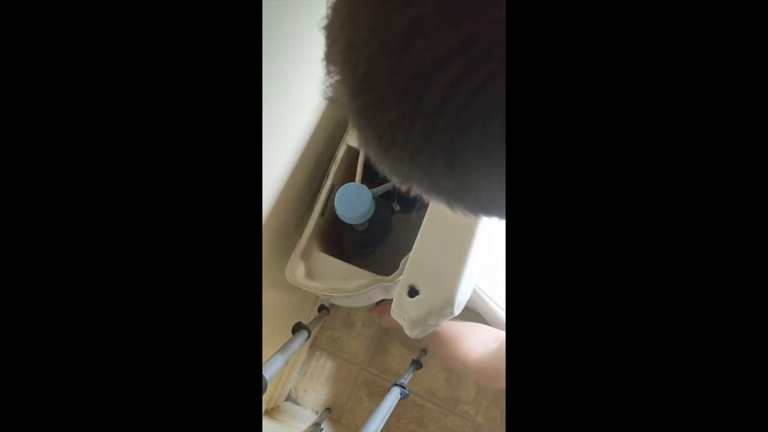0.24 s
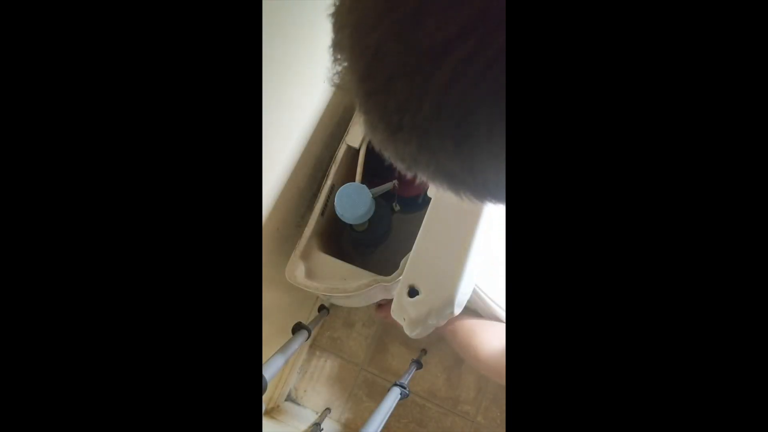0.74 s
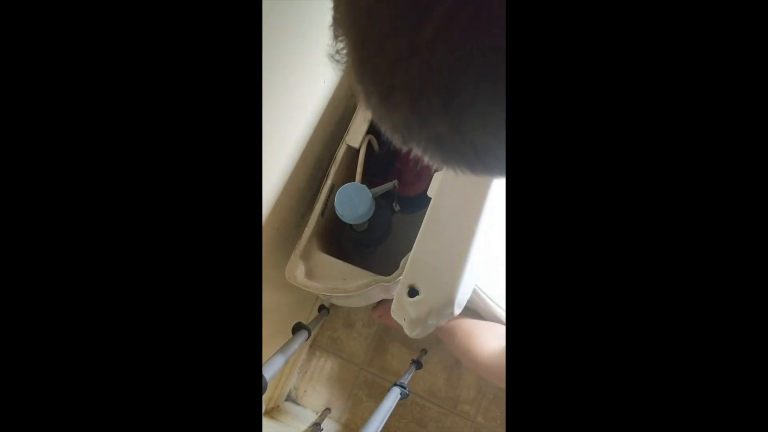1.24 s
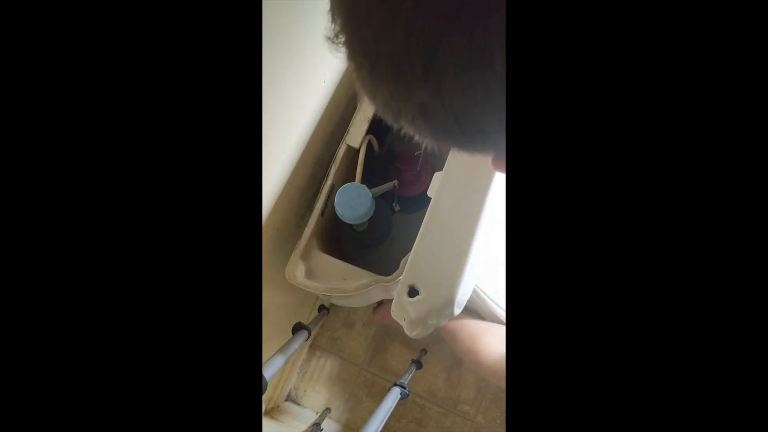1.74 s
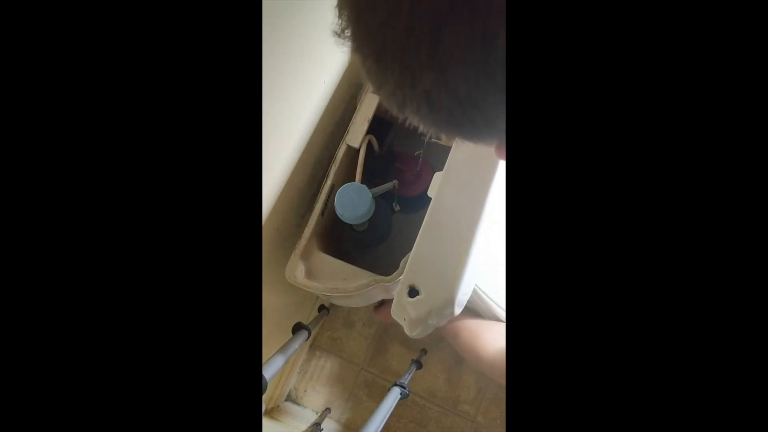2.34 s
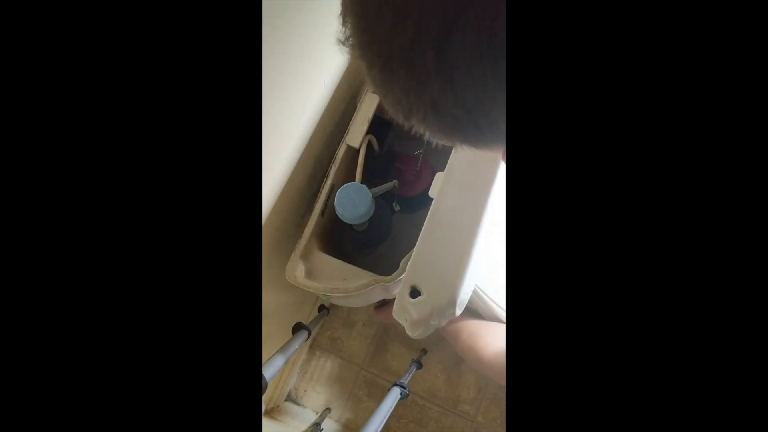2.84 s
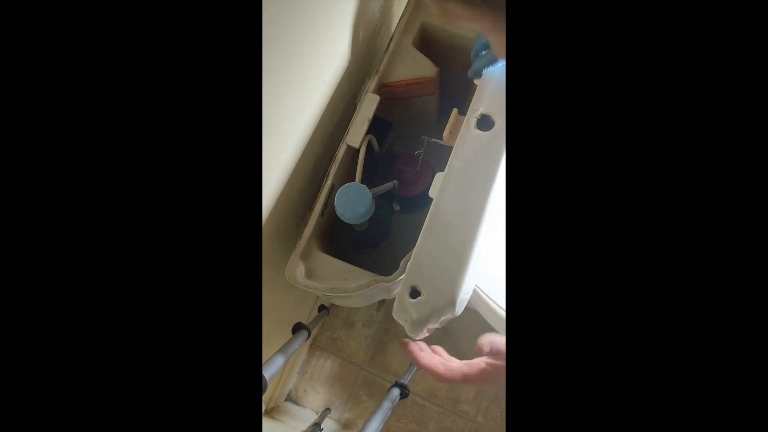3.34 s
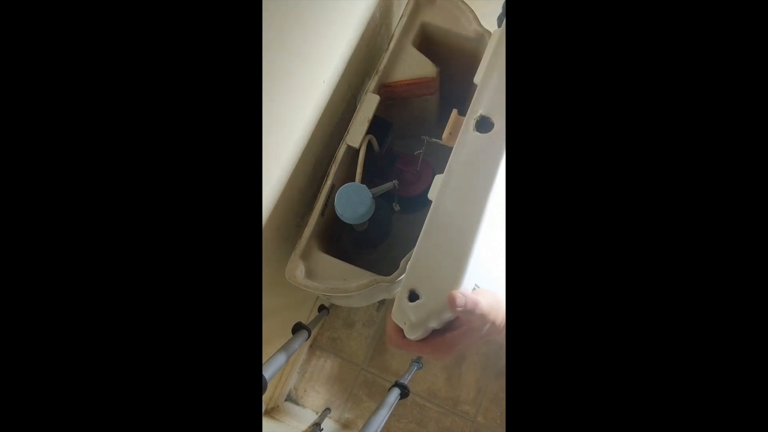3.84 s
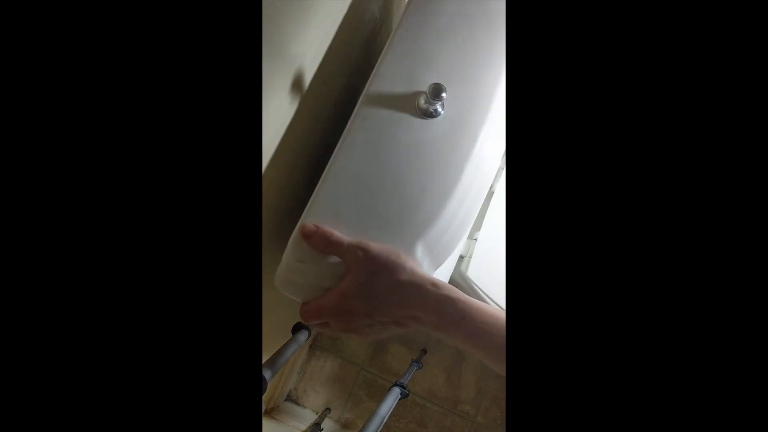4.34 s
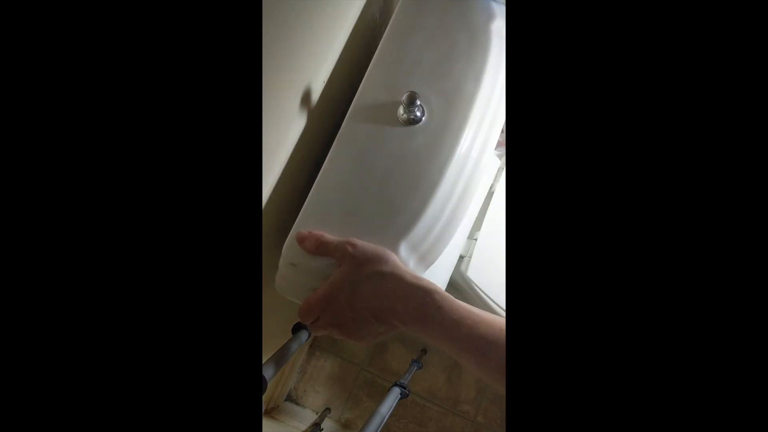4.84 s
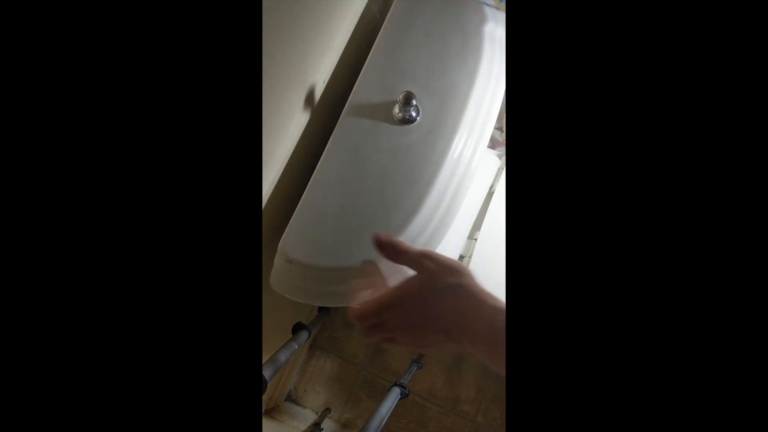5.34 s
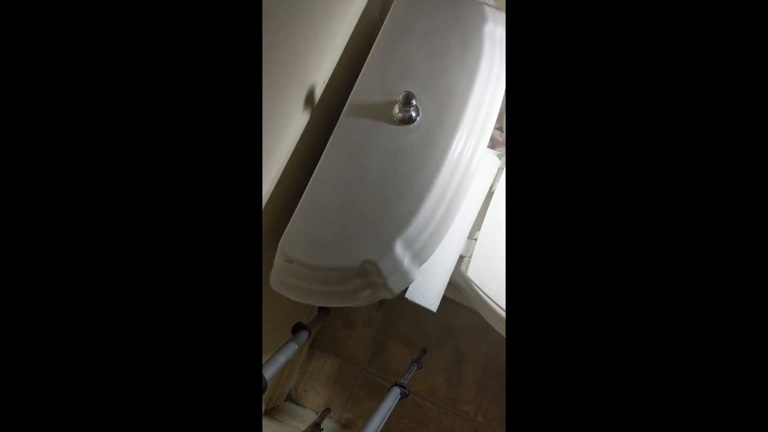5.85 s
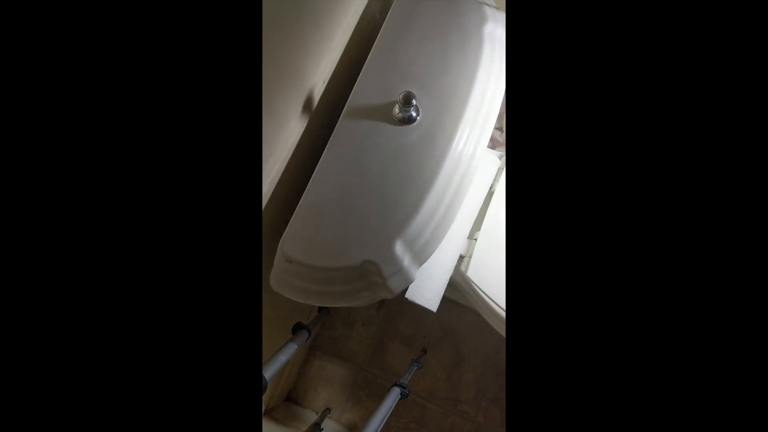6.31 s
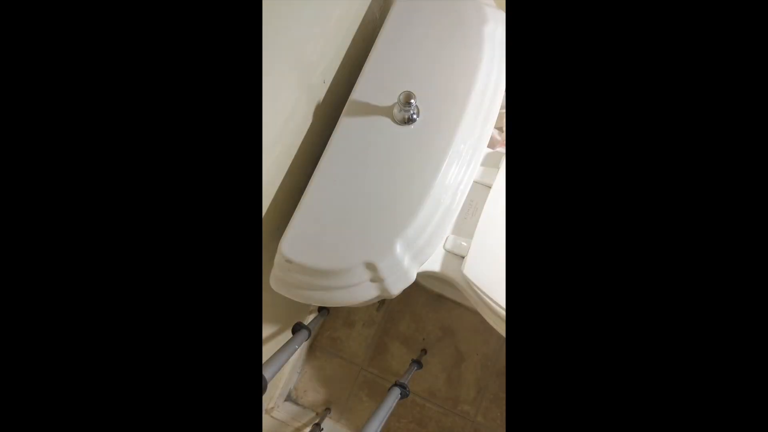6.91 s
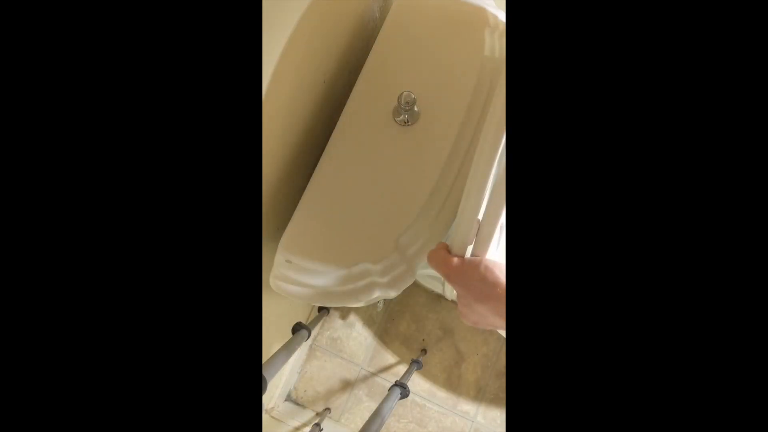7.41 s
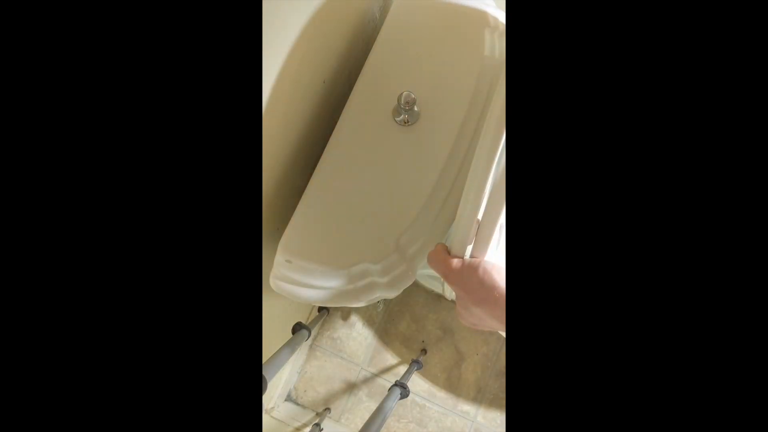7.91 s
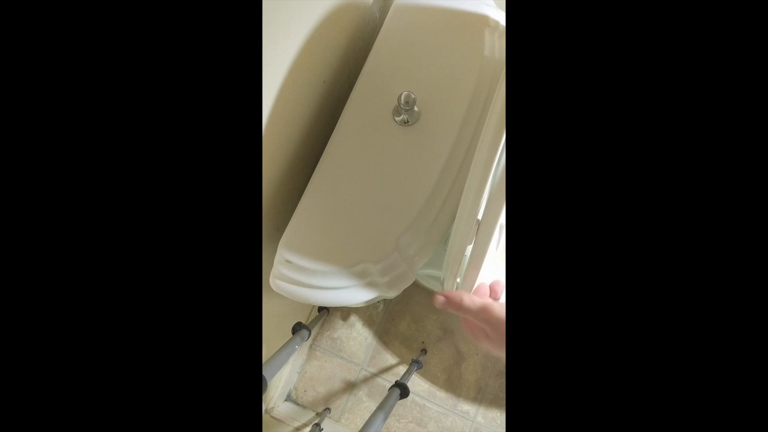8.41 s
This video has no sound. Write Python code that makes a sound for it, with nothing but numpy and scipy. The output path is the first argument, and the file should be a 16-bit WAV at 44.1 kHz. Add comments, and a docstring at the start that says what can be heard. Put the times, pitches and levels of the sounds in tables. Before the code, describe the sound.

Close up in a small tiled bathroom, a toilet tank refills with a bright, sputtering hiss, sharp drips and brief valve squeaks. The porcelain lid scrapes, knocks, then lands in four loud, quick clunks around five seconds. The water drops to a faint hollow hiss with soft plinks, while the seat is handled and clacks against the tank near seven seconds.

```python
"""A toilet tank refills in a small tiled bathroom: shaped noise makes the fill valve's hiss, swept tones
its squeaks, and short decaying tones the spray and drips that fall into the water.
The porcelain lid rubs as it is picked up (stick-slip tones), then clunks onto the tank in four main blows
(struck modes over clatter) and muffles the hiss. Drips go on ringing in the closed tank's air
while the seat is raised and knocks against it; room rumble and rustling hands are coloured noise."""
import sys
import numpy as np
from scipy import signal
from scipy.fft import rfft, irfft, next_fast_len
from scipy.io import wavfile
from scipy.ndimage import map_coordinates

SR = 44100
rng = np.random.default_rng(int(sys.argv[2]) if len(sys.argv) > 2 else 0)


def put_to_file(sound):
    """Save the sound as 16-bit audio at rate SR, in the file named by the first command-line argument."""
    columns = np.atleast_2d(sound).T  # one column per channel
    safe = np.clip(columns, -1, 1)
    whole_steps = np.round(safe * 32767)
    wavfile.write(sys.argv[1], SR, whole_steps.astype(np.int16))


N = 382347

# decay of the broadband part of knocks: frequency_hz, t60_s
KNOCK_DECAY = [(150, 0.13), (600, 0.082), (2500, 0.086), (8000, 0.087), (15000, 0.128)]
CLOSED_S, CLOSING_S = 5.0, 0.13  # the lid shuts the tank: middle and length of the ramp


def amp(db):
    """Level law: decibels to amplitude gain."""
    return 10 ** (np.asarray(db) / 20)


def unit(x):
    """Power normalisation: scale to rms 1."""
    return x / np.sqrt(np.mean(x ** 2) + 1e-20)


def along(points, hz):
    """Interpolate (frequency_hz, value) points on a logarithmic frequency axis."""
    point_hz, values = np.transpose(points)
    return np.interp(np.log(hz + 1), np.log(point_hz + 1), values)


def wobble(rate_hz, size):
    """Slow random modulation: a smooth curve through rate_hz random knots a second."""
    knots = rng.standard_normal(int(size * rate_hz / SR) + 4)
    return map_coordinates(knots, [np.arange(size) * rate_hz / SR])


def step(at_s, over_s):
    """Linear transition from 0 to 1, centred on a moment."""
    return np.clip((np.arange(N) / SR - at_s) / over_s + .5, 0, 1)


def filtered(x, response):
    """Linear filtering: multiply the spectrum of x by a function of frequency."""
    size = next_fast_len(len(x) + 8192)
    hz = np.fft.rfftfreq(size, 1 / SR)
    return irfft(rfft(x, size) * response(hz), size)[:len(x)]


def noise(spectrum, size):
    """Turbulence and friction as coloured Gaussian noise of rms 1."""
    return unit(filtered(rng.standard_normal(size), lambda hz: amp(along(spectrum, hz))))


def resonate(x, modes):
    """Parallel resonators (centre_hz, width_hz, level_db), squared for steeper, narrower peaks."""
    def response(hz):
        total = 0
        for centre_hz, width_hz, db in modes:
            damping = 1j * hz * width_hz
            total = total + amp(db) * (damping / (centre_hz * centre_hz - hz * hz + damping)) ** 2
        return total

    return filtered(x, response)


def soften(x, corner_hz):
    """Contact stiffness: a softer contact lasts longer and so keeps less treble."""
    return signal.lfilter(*signal.butter(2, min(corner_hz, SR / 2 - 1), fs=SR), x)


def dying(x, decay):
    """Frequency-dependent damping: each band of x dies at its own speed."""
    hz, t, bands = signal.stft(x, SR, nperseg=256)
    damped = bands * amp(-60 * t / along(decay, hz)[:, None])
    return signal.istft(damped, SR, nperseg=256)[1][:len(x)]


def fade(t, t60):
    """Exponential decay by 60 dB in t60 seconds."""
    return np.exp(-np.log(1000) * t / t60)


def ring(t, hz, t60):
    """One struck mode: a damped sinusoid."""
    return np.sin(2 * np.pi * hz * t) * fade(t, t60)


def swell(u, edge):
    """Rounded on-off envelope over u = 0..1; a smaller edge power is squarer."""
    return np.abs(np.sin(np.pi * u)) ** edge


def add(track, s, x):
    """Superposition: mix x into the track at time s."""
    i = max(round(s * SR), 0)
    track[i:i + len(x)] += x[:max(N - i, 0)]


def room(x, wet_db):
    """Reverberation: the tiled walls answer with a short, dense tail, convolved with the source."""
    # decay of the tiled room: frequency_hz, t60_s
    tile_decay = [(150, 0.32), (1000, 0.18), (4000, 0.15), (14000, 0.1)]
    tail = dying(rng.standard_normal(SR // 2), tile_decay)
    tail = np.pad(tail / np.linalg.norm(tail), (SR // 300, 0))  # the first echo comes late
    return x + amp(wet_db) * signal.fftconvolve(x, tail)[:N]


def bubble(hz, cycles, rise):
    """Bubble resonance: a tone decays by 1/e every so many cycles, gliding as it nears the surface."""
    t = np.arange(SR // 20) / SR
    u = t * hz / cycles
    phase = 2 * np.pi * np.cumsum(hz * (1 + rise * u)) / SR
    return np.sin(phase) * np.exp(-u) * (1 - np.exp(-8 * u))


def splat(hz, t60):
    """Drop impact: a brief, decaying patch of resonant noise around one pitch."""
    t = np.arange(SR // 20) / SR
    return unit(resonate(rng.standard_normal(len(t)), [(hz, hz / 4, 0)])) * fade(t, t60)


def plink(hz):
    """Cavity resonance: a drop's pitch starts sharp and settles near a resonance of the enclosed air."""
    t = np.arange(SR // 8) / SR
    pitch_hz = hz * (1 + 0.058 * fade(t, 0.032) + 0.018 * wobble(290, len(t)))
    warble = np.sin(2 * np.pi * np.cumsum(pitch_hz) / SR) * amp(2.0 * wobble(130, len(t)))
    return warble * fade(t, 0.13) * (1 - np.exp(-t / 0.0029))


def spray(count, low_hz, high_hz, cycles, spread_db):
    """Random superposition: droplets tick with random pitch, life and size, rms 1 in all."""
    when, pitch, life, size = rng.random((count, 4)).T[:, :, None]
    i = np.arange(SR // 70)
    turns = i / SR * low_hz * (high_hz / low_hz) ** pitch
    age = turns / (cycles * (.5 + life))
    size_db = spread_db * np.minimum(-np.log(1 - size), 4.2)  # few large drops, many small
    ticks = np.sin(2 * np.pi * turns) * np.exp(-age) * (1 - np.exp(-4 * age)) * amp(size_db)
    places = (when * N).astype(int) + i
    return unit(np.bincount(places.ravel(), ticks.ravel(), N)[:N])


def sputter(count, low_hz, high_hz, spread_db):
    """Random superposition: scattered splats of random pitch and size, rms 1 in all."""
    out = np.zeros(N)
    for when, pitch, size in rng.random((count, 3)):
        hz = low_hz * (high_hz / low_hz) ** pitch
        add(out, when * N / SR, amp(spread_db * size) * splat(hz, t60=0.0633))
    return unit(out)


def room_rumble():
    """Ambient noise: a steady random sound weighted to the low frequencies."""
    # spectrum: frequency_hz, density_db (relative, per Hz)
    rumble_spectrum = [(25, -2), (40, 0.5), (58, -9.5), (75, -22), (95, -4), (120, 1), (160, 0.5),
                       (200, -7.5), (250, -5), (350, -12.5), (460, -8.5), (570, -17), (660, -11.5),
                       (860, -25), (1300, -29)]
    return amp(-65.0) * noise(rumble_spectrum, N)


def rustles():
    """Sliding friction: skin moves over glaze and plastic in a quick string of small slips."""
    # hands slide over lid and seat: start_s, length_s, level_db
    slides = [(3.802, 0.13, -61), (3.937, 0.03, -53), (4.11, 0.031, -50.5), (4.677, 0.14, -60),
              (6.122, 0.25, -69.5), (6.453, 0.1, -63), (6.882, 0.13, -69)]
    # spectrum of the rub: frequency_hz, density_db (relative, per Hz)
    skin_spectrum = [(500, -9), (1500, -4), (3000, 2.5), (5000, -6.5), (7800, 3.5), (10000, -7.5),
                     (15500, -7)]
    out = np.zeros(N)
    for s, length_s, db in slides:
        slips = noise(skin_spectrum, SR // 2) * amp(5.1 * wobble(242, SR // 2))
        rub = unit(slips[:int(length_s * SR)])
        add(out, s, amp(db) * rub * swell(np.linspace(0, 1, len(rub)) ** .5, edge=.5))
    return out


def groans():
    """Stick-slip friction of lid and seat: a tone breaks into a scrape when the slips are uneven."""
    # rubs on the rests: start_s, length_s, pitch_hz, level_db, roughness (limited to 0-1)
    rubs = [(0.043, 0.15, 1573, -58, 0.37), (0.058, 0.094, 502, -59, .83), (3.522, 0.059, 142, -51.5, 0.07),
            (3.516, 0.053, 600, -54.5, 1.16), (3.572, 0.059, 452.6, -45, .03),
            (3.64, 0.13, 459.5, -61, 0.26), (6.16, 0.064, 292, -59, 0.6), (6.242, 0.082, 407, -57.5, 0.17)]
    out, t = np.zeros(N), np.arange(SR // 4) / SR
    for s, length_s, hz, db, rough in rubs:
        slips = rng.standard_normal(len(t)) * amp(5.1 * wobble(152, len(t)))
        scrape = unit(resonate(slips, [(hz, hz / 2.26, 0)]))
        share = np.clip(rough, 0, 1)  # the scrape's share of the power
        rub = np.sqrt(1 - share) * np.sin(2 * np.pi * hz * t) + np.sqrt(share) * scrape
        rub = rub[:int(length_s * SR)]
        add(out, s, amp(db) * unit(rub * swell(np.linspace(0, 1, len(rub)) ** 0.28, edge=0.28)))
    return out


def thud(t):
    """Low modes of tank and bowl, excited by any blow, build up and boom."""
    boom = ring(t, 142.6, 0.17) - 0.36 * ring(t, 111, .18) - .5 * ring(t, 185, 0.12)
    return boom * (1 - np.exp(-t / 0.0064))


def seat():
    """Impact of seat and hinges: a damped noise clack, one mode set by the struck spot, and a thud."""
    # knocks: start_s, level_db, spot_hz (mode of the struck spot), ring_db, brightness_hz
    knocks = [(4.369, -47, 200, -2, 500), (4.412, -56, 1320, -18, 12060), (4.7, -54, 458, 3, 2940),
              (4.754, -52, 1310, -9.5, 5840), (6.164, -62, 243, 17, 504), (6.251, -53.5, 251, 9, 1400),
              (6.478, -52.5, 256, 14.5, 1100), (6.765, -37.5, 157, 9, 411), (6.787, -33, 935, 10.5, 1720),
              (6.79, -31.5, 1028, 9, 3200), (6.905, -57, 257, 10, 3050), (6.94, -52.5, 149, 11, 1508),
              (6.982, -42, 1087, 13.5, 1720), (7.04, -52, 1064, 3.5, 1190), (7.331, -37.5, 500, 5, 6900),
              (7.361, -49, 610, 14, 800)]
    # spectrum of the clack: frequency_hz, density_db (relative, per Hz)
    body_spectrum = [(40, -37.5), (100, -41), (220, -3), (450, -6), (620, -6.5), (800, -4), (1400, -1),
                     (1750, -7.5), (2150, -1), (3000, -14), (5000, -13.5), (9000, -10.5), (15500, -7.5)]
    thud_db, thud_grows = -28.5, 0.39  # boom at a 0 dB knock; slow growth with force (dB per dB)
    rattle_db = 3  # unsteadiness of the ring
    out, t = np.zeros(N), np.arange(SR // 2) / SR
    for s, db, spot_hz, ring_db, bright_hz in knocks:
        clack = dying(noise(body_spectrum, len(t)), KNOCK_DECAY) * (1.75 + fade(t, 0.023))
        contact = 1 - np.exp(-t * bright_hz / 4)  # soft contacts build up more slowly
        spot = amp(ring_db + rattle_db * wobble(216, len(t))) * ring(t, spot_hz, 0.058)
        knock = amp(db) * contact * (soften(clack, bright_hz) + spot)
        add(out, s, knock + amp(thud_db + thud_grows * db) * thud(t))
    return out


def lid():
    """Modal impact: each contact rings the porcelain's modes over a dense, gritty clatter."""
    # contacts: start_s, level_db, brightness_hz, clatter_db, spot_hz (favoured by the contact spot)
    contacts = [(.218, -63.5, 2480, 6, 1800), (.259, -60.5, 2020, 1, 1590), (3.518, -57.5, 3000, 8.5, 1700),
                (3.571, -55.5, 2500, 0, 1600), (3.626, -59.5, 2550, 6, 1600), (4.174, -33, 2900, -6, 2430),
                (4.177, -32.5, 1800, -14, 1330), (4.288, -42, 1700, -9, 1300),
                (4.839, -24.5, 3600, -1, 2620), (4.916, -22, 1090, -5, 1330),
                (4.9798, -24.5, 6600, -0.5, 2650), (5.0278, -24.5, 6400, 2, 1060),
                (5.04, -35, 3230, 5.5, 1750)]
    # modes of the porcelain: frequency_hz, level_db, t60_s
    porcelain = [(410, -15, 0.069), (445, -6.5, 0.13), (502, -5, 0.07), (935, -16, 0.054),
                 (1123, -1, 0.0384), (1174, -2.5, 0.077), (1309, -2.5, 0.14), (1540, -10, 0.099),
                 (1780, -10.5, 0.082), (2410, -4, 0.12), (2456, -10.5, 0.15), (2645, -11, .06),
                 (2744, -5.5, 0.052), (3005, -13.5, 0.083), (3650, -24.5, 0.148), (4480, -11, 0.085),
                 (6120, -16, 0.086), (8000, -19.5, 0.076), (9910, -27, .08)]
    # spectrum of the clatter: frequency_hz, density_db (relative, per Hz)
    clatter_spectrum = [(40, -35), (100, -20.5), (200, 1.5), (450, -3), (700, -1.5), (1050, 0.5),
                        (2000, -3.5), (2700, 3), (3600, -9.5), (4600, -9.5), (6000, -22.5), (8200, -12.5),
                        (10000, -30.5), (15500, -12)]
    thud_db, thud_per_clatter = -10, 0.43  # flat, clattering contacts shake the tank more (dB per dB)
    out, t = np.zeros(N), np.arange(SR // 2) / SR
    for s, db, bright_hz, clatter_db, spot_hz in contacts:
        modes = np.zeros(len(t))
        for hz, level_db, t60 in porcelain:
            # modes that swing most at the spot gain some dB
            favour_db = 7.2 * np.exp(-(np.log(hz / spot_hz) / 0.12) ** 2)
            sign = rng.choice([-1, 1])
            modes += sign * amp(level_db + favour_db + rng.normal(0, 1)) * ring(t, hz, t60)
        modes *= 1 - np.exp(-t / 0.0017)  # the ringing spreads from lid to tank
        clatter = dying(noise(clatter_spectrum, len(t)), KNOCK_DECAY) * (1.01 + 1.33 * fade(t, 0.0149))
        grit = 0.31 * fade(t, 0.0085) * rng.standard_normal(len(t))
        clunk = soften(0.85 * modes + amp(clatter_db) * (clatter + grit), bright_hz)
        boom = amp(thud_db + thud_per_clatter * clatter_db) * thud(t)
        add(out, s, amp(db) * (clunk + boom))
    return out


def drips():
    """Drop and bubble resonance: bright splats in the open tank, lower plinks in the air under the lid."""
    # loudest drips in the open tank: start_s, level_db, pitch_hz
    open_drips = [(0.266, -48.5, 4770), (.8764, -46, 4680), (1.2371, -48.5, 6300), (1.9324, -39.5, 5760),
                  (2.1321, -45, 5250), (2.5247, -49, 2350), (2.54, -48, 3470), (2.7851, -48, 5500),
                  (3.1014, -39.5, 4400), (3.2903, -46, 4750), (3.307, -43.5, 2680), (4.4824, -45.5, 4000)]
    # loudest drips under the lid: start_s, level_db, pitch_hz (air resonance that they ring)
    lid_drips = [(5.3459, -51, 2070), (5.5832, -57.5, 2050), (5.814, -55, 2315), (5.9286, -58, 2060),
                 (6.385, -56.5, 2070), (6.6055, -53, 2080), (6.8967, -51.5, 2070), (7.1688, -57.5, 2076),
                 (7.4925, -54.5, 2060), (8.0532, -51.5, 2050), (8.1176, -54.5, 2070), (8.1999, -53.5, 2087),
                 (8.2882, -58, 2040), (8.4573, -57.5, 2080), (8.5651, -53.5, 2040), (8.6537, -55, 2080)]
    # larger bubbles that rise in pitch as they surface: start_s, level_db, pitch_hz
    blubs = [(.41, -45.5, 1790), (2.549, -49, 1590), (5.901, -59, 1490), (6.562, -54, 2620),
             (7.071, -47, 1530), (7.606, -55.5, 1420)]
    main_hz = 2070  # main air resonance under the lid
    faint_db, faint_spread = -64, 0.139  # fainter plinks fall at random, up to this share higher
    out = np.zeros(N)
    for s, db, hz in open_drips:
        add(out, s, amp(db) * (0.48 * splat(hz, t60=0.049) + 0.75 * bubble(hz, cycles=9.6, rise=0)))
    for s, db, hz in lid_drips:
        add(out, s, amp(db) * plink(hz))
    for when, detune in rng.random(size=(12, 2)):
        s = CLOSED_S + when * (N / SR - CLOSED_S)
        add(out, s, amp(faint_db) * plink(main_hz * (1 + faint_spread * detune)))
    for s, db, hz in blubs:
        add(out, s, amp(db) * bubble(hz, cycles=12, rise=0.071))
    return out


def squeaks():
    """Self-excited flutter of the valve seal: short, unsteady whistles with overtones shake the tank a little."""
    # whistles: start_s, length_s, pitch_hz (middle of the glide), glide_octaves, level_db, roughness (0-1)
    whistles = [(.116, 0.025, 3380, -0.062, -44, 0.06), (0.374, 0.045, 2160, -0.33, -55.5, 0.35),
                (0.779, 0.028, 3120, 0.022, -44, 0.37), (1.381, 0.03, 3490, 0.057, -52, 0.2),
                (1.421, 0.032, 3180, -0.14, -45, 0.17), (1.721, 0.0095, 2815, 0.027, -47.5, 0.36),
                (1.888, 0.027, 2700, 0.5, -41, .25), (2.015, 0.09, 3304, 0.043, -46, 0.15),
                (2.281, 0.016, 3320, .2, -49.5, 0.29), (2.402, 0.02, 2552, 0.064, -44, 0.28),
                (2.461, 0.016, 2686, -.04, -44, 0.28), (2.973, 0.062, 3284, .27, -38, 0.32)]
    sharp, settle_s = 0.105, 0.024  # each starts this share sharp and settles (t60)
    # harder squeaks have stronger overtones: level where they have plain strength; dB gained per dB
    even_db, overtones_grow = -42.5, 1.5
    out = np.zeros(N)
    for s, length_s, pitch_hz, glide, db, rough in whistles:
        size = int(length_s * SR)
        u = np.linspace(0, 1, size)
        jitter, flutter = wobble(1137, SR // 4)[:size], wobble(355, SR // 4)[:size]
        stagger = wobble(160, SR // 4)[:size]  # the seal catches and lets go
        bend = 1 + sharp * fade(u * length_s, settle_s) + 0.12 * rough * jitter + 0.073 * rough * stagger
        hz = pitch_hz * 2 ** (glide * (u - .5)) * bend
        phase = 2 * np.pi * np.cumsum(hz) / SR
        overtones_db = overtones_grow * (db - even_db)
        tone = np.sin(phase)
        for k, level_db in enumerate([-4, -9, -26], 2):
            tone = tone + amp(overtones_db + level_db) * np.sin(k * phase)
        tone = tone + .5 * rough * rng.standard_normal(size)  # spray forced past the seal
        shudder = amp(-21 + overtones_db) * np.sin(2 * np.pi * 143 * u * length_s)
        envelope = swell(u, edge=0.41) * amp(11.0 * rough * flutter)
        add(out, s, amp(db) * unit((tone + shudder) * envelope))
    return out


def building_db():
    """Rising flow rate: the level builds from weak to full, where it is 0 dB."""
    weak_db, middle_s, build_s = -2.5, 1.63, 0.64
    return weak_db * (1 - step(middle_s, build_s))


def flow_db():
    """Pressure release: the valve cracks open with a spurt, runs weakly, then reaches full flow (0 dB)."""
    opens_s, opening_s, shut_db = 0.11, .03, -12
    spurt_db, spurt_s = 14.5, 0.073  # extra level, falling by 1/e in spurt_s
    spurt = spurt_db * np.exp(-np.maximum(np.arange(N) / SR - opens_s, 0) / spurt_s)
    opened = step(opens_s, opening_s)
    return shut_db * (1 - opened) + spurt * opened + building_db()


def closed_tank():
    """Transmission and cavity resonance: the faint hiss is coloured by the air space, and spray crackles."""
    # spectrum of the leaking hiss: frequency_hz, density_db (relative, per Hz)
    covered_spectrum = [(400, -7), (900, 5), (1800, -10.5), (2800, 4), (5000, 3), (7000, -6), (12000, -6),
                        (15500, -1.5)]
    # air resonances of the closed tank: centre_hz, width_hz (before squaring), level_db
    cavity = [(700, 83, -4), (1007, 108, 1), (1335, 72, 4.5), (1596, 190, -2.5), (1787, 62, 4),
              (2058, 84, -5.5), (2351, 170, -1.5), (3646, 64, -1)]
    leak_db, crackle_db = -68, -80.5
    raised_s, screen_db = 7.3, -3  # the raised seat screens the crackle from the gap
    hollow = unit(resonate(rng.standard_normal(N), cavity)) * amp(-4 + 1.1 * wobble(31, N))
    crackle = spray(count=2400, low_hz=4720, high_hz=15300, cycles=7.4, spread_db=6)
    unsteady_db = 1.5 * wobble(19, N) + 4.3 * wobble(6.4, N)
    crackle *= amp(crackle_db + screen_db * step(raised_s, .3) + unsteady_db)
    burble = unit(resonate(rng.standard_normal(N), [(2078, 89, 7), (2342, 183.4, -4.5)]))
    burble *= amp(-16.0 + 5.33 * wobble(18, N))
    leak = noise(covered_spectrum, N) * amp(-5 + .8 * wobble(50, N))
    return (leak + hollow + burble) * amp(leak_db + 0.31 * building_db()) + room(crackle, wet_db=2)


def open_tank():
    """Jet turbulence hisses and throws uneven spray; water sings in the overflow pipe's air resonances."""
    # spectrum of the jet: frequency_hz, density_db (relative, per Hz)
    jet_spectrum = [(300, -10.5), (800, -14), (1100, 0), (2000, -4), (3100, -13), (4000, -1.5),
                    (6300, -2.5), (7500, -4.5), (9300, -4.5), (13000, -4.5), (15500, 3.5)]
    # air resonances of the pipe: centre_hz, width_hz (before squaring), level_db
    pipe_modes = [(1112, 57, 1.5), (1314, 400, 0.5), (1778, 61, 1.5), (2727, 350, 1.5), (3116, 440, 2)]
    # reference levels at full flow; the pipe's song grows faster than the flow (dB per dB)
    hiss_db, pipe_db, pipe_grows = -65.5, -65, 3.3
    lowered_s, lowering_s, shade_db = 4.47, .15, -3.5  # the lowered lid first shades the tank
    jet = noise(jet_spectrum, N) * amp(7.0 + 0.79 * wobble(24.74, N))
    patter = spray(count=1800, low_hz=2303, high_hz=11300, cycles=19.0, spread_db=4.5)
    patter = unit(room(patter, wet_db=6)) * amp(-3.0 + 1.7 * wobble(28, N))
    fizz = spray(count=3000, low_hz=9200, high_hz=15540, cycles=6.3, spread_db=3.5)
    fizz *= amp(-8.5 + 1.2 * wobble(45, N))
    spits = amp(1.0) * sputter(count=520, low_hz=2314, high_hz=13950, spread_db=16)
    sizzle = amp(-2.0) * sputter(count=90, low_hz=11660, high_hz=14700, spread_db=11.5)
    pipe = unit(resonate(rng.standard_normal(N), pipe_modes))
    pipe *= amp(pipe_db + pipe_grows * building_db() + 1.5 * wobble(12, N))
    hiss = jet + patter + fizz + spits + sizzle
    hiss *= amp(hiss_db + flow_db() + shade_db * step(lowered_s, lowering_s))
    return (hiss + pipe) * (1 - step(CLOSED_S, CLOSING_S))


def scene():
    """Superposition of water, porcelain and seat over the low rumble of the room."""
    water = open_tank() + closed_tank() + room(squeaks() + drips(), wet_db=-6.0)
    handling = room(lid() + seat() + groans() + rustles(), wet_db=-10.5)
    return (water + handling + room_rumble())[None]


def record(dry):
    """Band limitation: the microphone drops the deep bass and keeps nothing above its upper limit."""
    top_hz = 15850
    thin = signal.sosfilt(signal.butter(4, 78, "highpass", fs=SR, output="sos"), dry)
    return np.array([filtered(channel, lambda hz: hz < top_hz) for channel in thin])


dry = scene()
out = record(dry)
put_to_file(out)
```